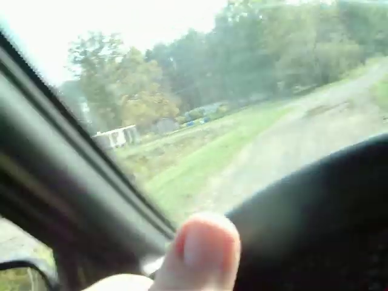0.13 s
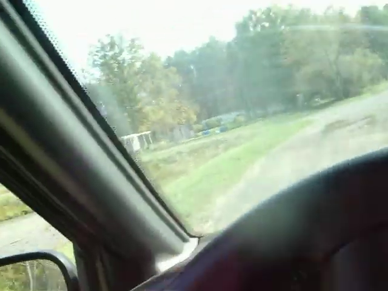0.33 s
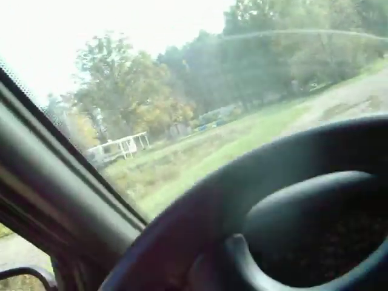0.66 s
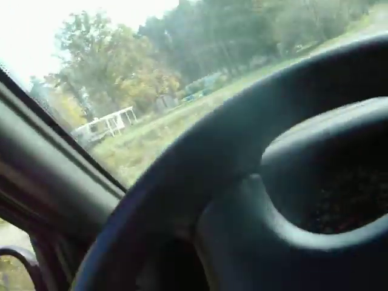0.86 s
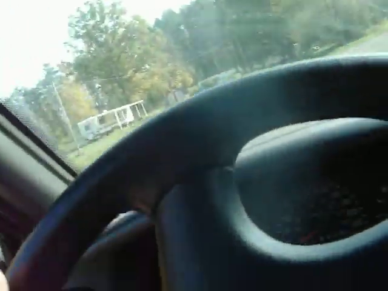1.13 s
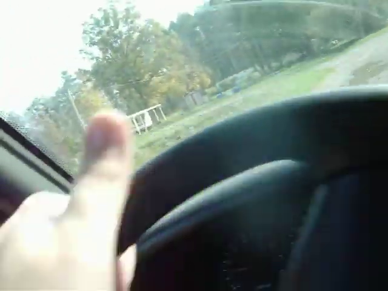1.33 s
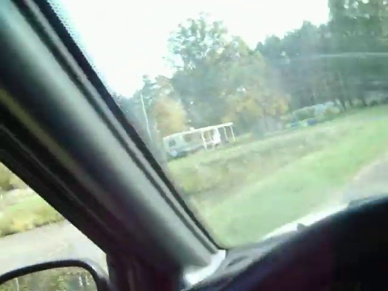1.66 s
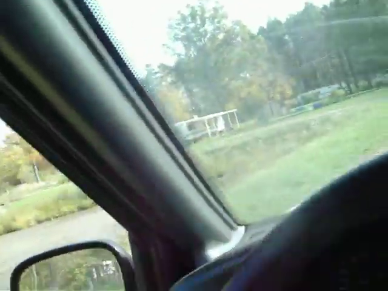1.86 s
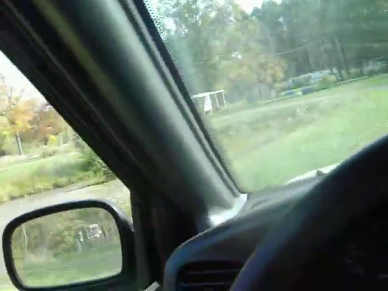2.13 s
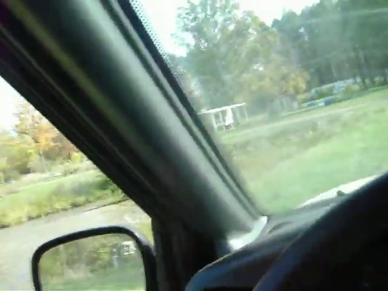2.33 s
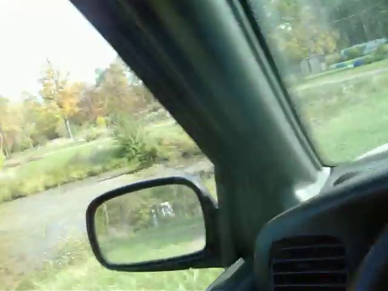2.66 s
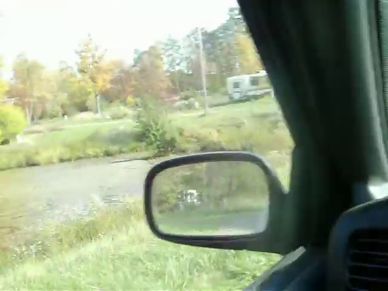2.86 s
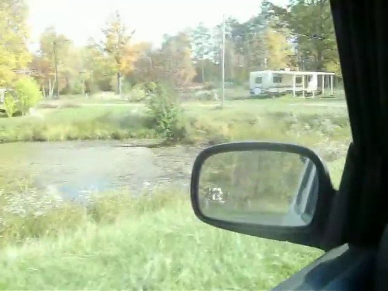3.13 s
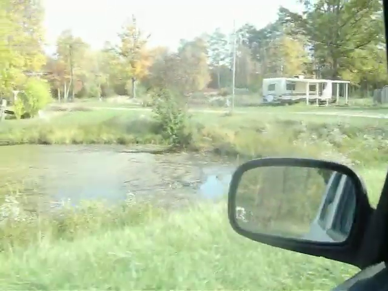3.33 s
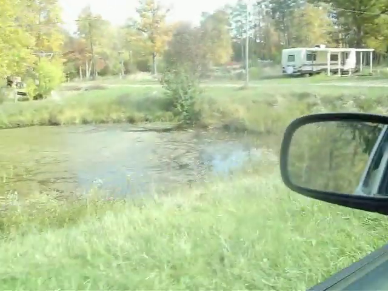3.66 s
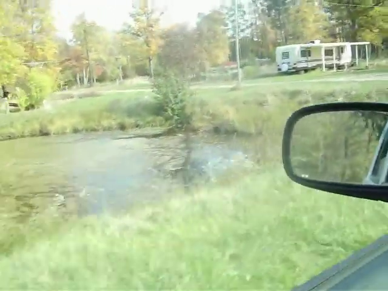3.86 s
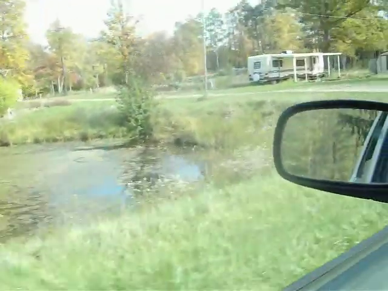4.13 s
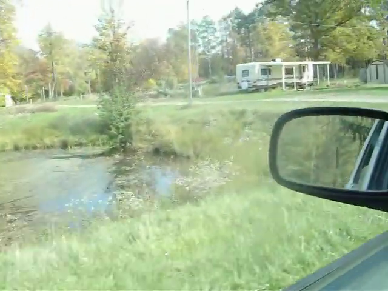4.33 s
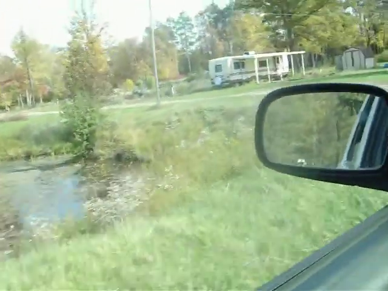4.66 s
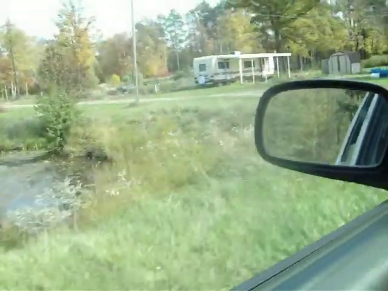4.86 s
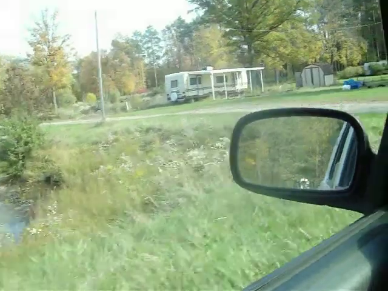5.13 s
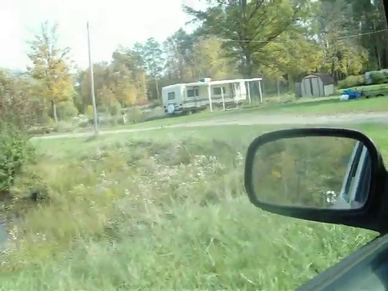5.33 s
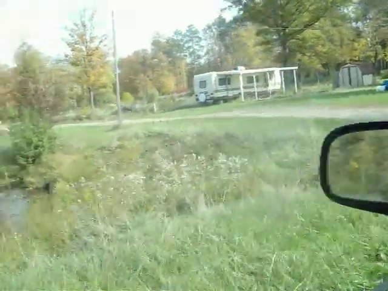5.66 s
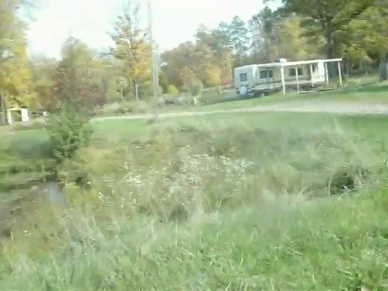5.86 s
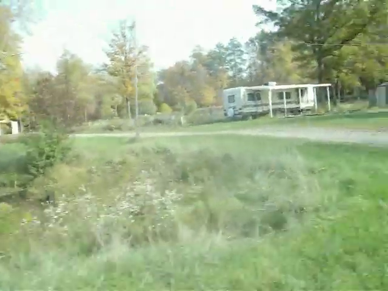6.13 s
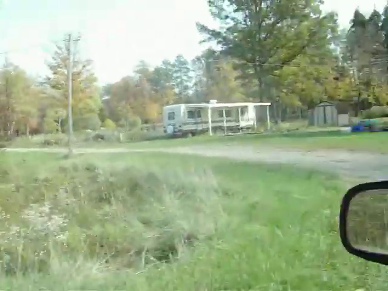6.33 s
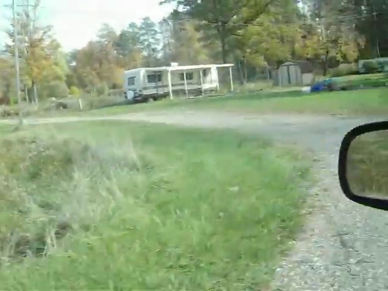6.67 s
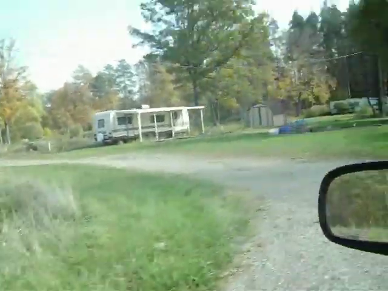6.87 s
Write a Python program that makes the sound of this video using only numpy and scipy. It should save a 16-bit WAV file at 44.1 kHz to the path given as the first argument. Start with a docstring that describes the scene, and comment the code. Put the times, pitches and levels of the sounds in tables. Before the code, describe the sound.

Inside a slow car with the window open, gravel crunches and hisses while stones knock underneath, the suspension thumps and trim rattles.

```python
"""A low, wavering cab boom and body rumble come first, under crunching gravel and hissing tyres.
A car rolls slowly over grass and gravel, heard by a small camera held at the open driver's window.
Boom is a tone with a noise skirt; rumble, crunch and hiss are banded noise driven by random grains.
Snaps are noise bursts; knocks, thuds and ticks ring clusters of modes; one metal clink is two sines.
The hiss peaks near 4 kHz, the converter stops near 6 kHz and the loudest peaks clip."""
import sys
import numpy as np
from scipy import signal
from scipy.fft import rfft, irfft, next_fast_len
from scipy.io import wavfile
from scipy.ndimage import uniform_filter1d

SR = 44100
rng = np.random.default_rng(int(sys.argv[2]) if len(sys.argv) > 2 else 0)


def store_pcm(level_fs):
    """Save levels as 16-bit WAV."""
    pcm = np.round(np.clip(level_fs, -1, 1) * 32767).astype(np.int16)
    wavfile.write(sys.argv[1], SR, np.atleast_2d(pcm).T)


N = 309141

# Slow levels of the rolling layers, before dips and wavering:
# start_s, boom_db, body_db, crunch_db, hiss_db [s, dB, dB, dB, dB]
ROLLING_LEVELS = [(0, -16, -18.5, -25, -27.5), (.4, -21.5, -21, -23, -31.5), (.7, -15.5, -16.5, -22, -27),
                  (1.0, -18, -19.5, -24, -29.5), (1.2, -23, -23.5, -23.5, -29),
                  (1.36, -12, -17.5, -21.5, -26.5), (1.65, -17, -21, -22, -26),
                  (1.82, -17.5, -20, -20, -26), (2.05, -16, -18, -20.5, -28), (2.3, -16, -20.5, -22, -27.5),
                  (2.6, -17.5, -21.5, -24, -28), (2.9, -19.5, -22.5, -23.5, -28),
                  (3.3, -13, -21, -21, -26.5), (3.65, -21.5, -23.5, -21, -27.5),
                  (3.9, -26, -20.5, -20.5, -26), (4.2, -26, -20, -17.5, -24.5),
                  (4.42, -18.5, -24.5, -20.5, -23.5), (4.75, -24, -16.5, -20.5, -24.5),
                  (5.1, -20, -19, -18, -22.5), (5.5, -17.5, -21, -21.5, -24.5), (5.75, -14, -12, -19, -25),
                  (6.1, -28, -23, -21.5, -30.5), (6.3, -17, -19.5, -23.5, -30.5),
                  (6.5, -18, -23, -21, -30.5), (6.75, -30, -17.5, -20.5, -28.5),
                  (7.01, -26.5, -17, -20, -28)]
# Sudden drops of the rolling sound: start_s, depth_db, hold_s, return_s [s, dB, s, s]
ROLLING_DIPS = [(1.403, 5.5, 0.32, 0.14), (3.913, 7.5, 0.2, 0.26), (4.09, 1, 0.037, 0.081),
                (4.466, 5.5, 0.07, 0.069), (5.802, 5.5, .02, 0.013)]
# Road jolts that swell the cab boom, before its mix: crest_s, level_db, pitch_hz [s, dB, Hz]
BOOM_JOLTS = [(.13, -16, 47.1), (.27, -9.5, 47.2), (.6, -9.5, 48.1), (.72, -14, 52.3), (.8, -12, 51.2),
              (.88, -11.5, 51.2), (1.03, -18, 47.65), (1.17, -8, 53.3), (1.31, -10, 54.2),
              (1.39, -6.5, 55.4), (1.8, -13, 54.87), (1.96, -11, 53.8), (2.05, -6.5, 54.1),
              (2.22, -20.5, 52.05), (2.5, -12, 48.3), (2.64, -8, 46.04), (2.83, -13, 58.25),
              (3.03, -18, 44), (3.3, -17, 43.3), (3.47, -21, 48), (3.65, -15.5, 53), (4.1, -18.5, 50.5),
              (4.37, -10.5, 50.44), (4.63, -7, 51.88), (4.72, -15, 48.47), (4.92, -14, 40.9),
              (5.08, -12.5, 52.8), (5.23, -13, 52.2), (5.41, -18, 42.7), (5.56, -14.5, 45.6),
              (5.7, -0.5, 47.77), (5.779, -10, 54.8), (5.86, -10, 54.4), (6.19, -15, 48.5),
              (6.36, -8.5, 49.7), (6.6, -13, 50.1), (6.95, -14.5, 50.3)]
# Noise colour of the body rumble: frequency_hz, density_db [Hz, dB per Hz]
BODY_COLOUR = [(60, 0), (100, -2.5), (140, 0.5), (178, -3), (205, 1.5), (235, -3), (285, -3.5), (320, -2),
               (355, -6), (392, -4), (450, -15.5), (600, -23.5), (800, -24)]
# Noise colour of the gravel crunch: frequency_hz, density_db [Hz, dB per Hz]
CRUNCH_COLOUR = [(300, -2), (450, 1), (650, 0), (900, -2), (1200, -6.5), (1800, -9), (2500, -14),
                 (3500, -23)]
# Brightness of the gravel crunch, before its wavering: start_s, tilt_db [s, dB per octave]
CRUNCH_TILT = [(0, 1.5), (.5, 0.5), (1, 0.5), (1.4, -0.5), (1.7, -1.5), (2.2, 2.5), (2.55, 2.5), (3, 0),
               (3.5, 2), (3.9, 0.5), (4.2, -0.5), (4.6, -1), (5.1, 0), (5.5, 2), (5.8, -2), (6.2, -1),
               (6.6, 0), (7.01, 1)]
# Noise colour of the tyre hiss: frequency_hz, density_db [Hz, dB per Hz]
HISS_COLOUR = [(1600, -22), (2600, -16.5), (3300, -12.5), (4000, -5), (4500, -13), (5200, -21), (5800, -21),
               (6400, -43.5)]
# Dry broad snaps, before the treble loss: start_s, level_db [s, dB]
DRY_SNAPS = [(0.0115, -9.5), (0.076, -10), (0.243, -6.5), (0.5901, -4.5), (0.7287, -7), (0.8864, -10),
             (1.2162, -6), (2.7651, -5), (3.3423, -5), (3.9063, -7.5), (3.9537, -16), (4.0851, -7.5),
             (4.463, -5), (4.5582, -10), (4.6217, -7), (5.211, -4), (5.7912, -12), (6.032, -7.5),
             (6.2272, -5), (6.3637, -5)]
# Stones knocking under the floor, before the treble loss: start_s, level_db, pitch_hz, t60_s [s, dB, Hz, s]
STONE_KNOCKS = [(0.045, -7.5, 705, 0.084), (0.215, -7, 686, 0.065), (0.242, -3, 664, 0.051),
                (0.562, -8, 773, 0.061), (1.054, -9.5, 1095, 0.065), (1.358, 4.5, 663, 0.079),
                (2.132, -9, 904, 0.054), (2.206, -7, 880, 0.076), (2.35, -9, 1570, 0.056),
                (2.383, -5, 1043, 0.055), (2.449, -8, 840, 0.065), (2.692, -9.5, 1756, 0.057),
                (2.765, -4, 1148, 0.087), (2.789, -5.5, 802, 0.069), (2.819, -8, 732, 0.12),
                (2.874, -5.5, 1108, 0.077), (3.048, -8, 633, 0.12), (3.079, -5.5, 1066, 0.072),
                (3.313, -9, 799, 0.081), (3.341, -2.5, 882, 0.07), (3.484, -9, 961, 0.084),
                (3.545, -8.5, 619, 0.071), (3.701, -5, 652, 0.065), (3.756, -7.5, 787, 0.079),
                (4.278, -9, 877, 0.096), (4.328, -11, 901, 0.065), (4.359, -6.5, 862, 0.084),
                (4.462, -5, 649, 0.039), (4.603, 1, 790, 0.084), (4.797, -6.5, 970, 0.062),
                (4.841, -8, 708, 0.065), (4.908, -12, 627, 0.065), (4.96, -11, 665, 0.059),
                (5.21, -9, 622, 0.076), (5.361, -8.5, 1307, 0.081), (5.437, -10.5, 1464, 0.061),
                (5.487, -4, 632, 0.065), (5.664, -1.5, 710.6, 0.064), (5.736, 2.5, 652, 0.065),
                (5.828, -6, 752, 0.079), (5.926, -13, 604, 0.061), (5.973, -10.5, 896, 0.052),
                (6.031, -6.5, 1124, 0.059), (6.139, -16, 673, 0.057), (6.178, -7.5, 758, 0.078),
                (6.222, -2, 689, 0.077), (6.244, 1, 673, 0.079), (6.379, -6, 1070, 0.064),
                (6.43, -9, 813, 0.062), (6.656, -12, 890, 0.065), (6.673, -8, 884, 0.071),
                (6.72, -3.5, 965, 0.057), (6.755, -5, 605, 0.043), (6.851, -5.5, 1047, 0.074)]
# Bumps through the suspension, before the treble loss; the swell shifts the body rumble:
# start_s, level_db, pitch_hz, swell_db [s, dB, Hz, dB]
SUSPENSION_THUDS = [(0.075, -9, 355, 0), (0.209, -8, 325, -3), (0.396, -11, 328, 1),
                    (0.477, -13.5, 132, -0.5), (0.569, -9.5, 220, -4), (0.66, -5, 286, 3),
                    (0.946, -11, 204, 7.5), (1.355, -3.5, 400, 5), (1.859, -10, 385, -1),
                    (1.929, -8.5, 312, 4.5), (2.498, -16, 202, 4), (3.459, -10, 200, 0.5),
                    (3.548, -11, 320, 3), (3.707, -6.5, 291, 0), (3.814, -10.5, 287, -1),
                    (4.355, -11, 285, 4), (4.425, -12, 139, 5), (4.596, -18, 153.4, 9),
                    (4.891, -11, 209, -1), (4.993, -16, 328, -1), (5.067, -9, 291.5, 0),
                    (5.129, -11, 160, 2), (5.343, -9, 306, 7.5), (5.483, -15, 410.5, 1),
                    (5.62, -5.5, 322.8, 4), (5.662, -5.5, 411.3, 0), (5.709, -12, 147.8, 2.5),
                    (5.827, -8, 431, 2), (6.076, -6.5, 324, 0), (6.36, -5, 192, 6), (6.564, -5, 314, 12.5),
                    (6.742, -5.5, 176.6, 1), (6.821, -2, 319, 0.5), (6.937, -5, 190, 4)]
# Small trim and grit ticks, before the treble loss: start_s, level_db, pitch_hz [s, dB, Hz]
TRIM_TICKS = [(0.128, -8.5, 3870), (0.209, -9.5, 4070), (0.2984, -19, 4020), (0.3162, -13.5, 3900),
              (0.3634, -6, 3880), (0.5496, -11.5, 4170), (0.6725, -9.5, 4015), (0.6993, -16.5, 3570),
              (0.7544, -11, 3960), (0.8006, -9, 3410), (0.9195, -7.5, 3900), (0.9467, -11, 4260),
              (1.1518, -12, 3760), (1.1698, -11.5, 4020), (1.3618, -6.5, 3980), (1.4526, -13.5, 3950),
              (1.509, -17, 3540), (1.54, -16, 3920), (1.6517, -10.5, 3900), (1.7025, -20, 4090),
              (1.8537, -13, 3940), (1.8896, -10, 3800), (2.0099, -12, 3670), (2.0286, -9.5, 4000),
              (2.123, -12, 3800), (2.2413, -12.5, 3900), (2.4556, -9, 4070), (2.4911, -15, 3990),
              (3.3587, -19, 3614), (3.6344, -7, 4120), (3.791, -6.5, 3300), (4.351, -12, 3660),
              (4.4179, -11, 4240), (4.585, -10.5, 4230), (4.9132, -19, 4099), (5.6236, -21, 3800),
              (5.7551, -7, 3710), (6.0975, -14, 3728), (6.1808, -12, 3950), (6.2272, -15, 3910),
              (6.355, -9, 3856), (6.8103, -10, 3900), (6.846, -17, 2510)]
# Modes of a loose metal part: pitch_hz, level_db, t60_s [Hz, dB, s]
CLINK_MODES = [(3790, -21, .3), (4250, -26, .55)]

JOLT_RISE_S, JOLT_FALL_S = 0.028, 0.028  # widths of the bell-shaped swell
BOOM_WAVER = 0.055  # random pitch spread, as a share of the pitch
GRAIN_TOP_DB = 9  # ceiling on tyre grain size, before levelling
RING_S = 0.25  # length of every blow and snap
SNAP_T60_S, SNAP_HZ = 0.013, (990, 4280)
CRACK_T60_S, CRACK_HZ = 0.012, (1210, 4830)  # dry edge at the start of a blow
KNOCK_SPREAD_OCT = 0.629
THUD_T60_S, THUD_SPREAD_OCT, SWELL_T60_S = 0.097, 0.43, 0.12
TICK_T60_S, TICK_SPREAD_OCT = 0.054, 0.5
CLINK_S = 5.898  # moment of the tap
BLOW_TOP_HZ = 4430  # seats and trim swallow the treble of blows and snaps
SOFT_TOP = 1.23  # the capsule starts to round peaks near this size
CONVERTER_HZ, CLIP, TOP_HZ = 5990, 0.715, 15800


def undb(db):
    """Decibels to amplitude."""
    return 10 ** (np.asarray(db) / 20)


def unit(x):
    """Scale to an RMS of 1."""
    return x / np.sqrt(np.mean(x ** 2))


def add(out, start_s, sound):
    """Mix a sound in at its start time, cut at the end of the scene."""
    i = int(start_s * SR)
    out[i:i + len(sound)] += sound[:N - i]


def curves(table):
    """Straight lines through each column of a table, over the first column's times."""
    times, *columns = np.transpose(table)
    return [np.interp(np.arange(N) / SR, times, column) for column in columns]


def walk(rate):
    """Random levels drawn rate times a second and smoothed twice; RMS 1."""
    step = int(SR / rate)
    held = np.repeat(rng.standard_normal(N // step + 1), step)
    slewed = uniform_filter1d(uniform_filter1d(held, step), step)
    return unit(slewed[:N])


def fade(t60, rise_s, length_s=RING_S):
    """Time axis and envelope of a blow: quick rise, exponential fall."""
    t = np.arange(int(length_s * SR)) / SR
    return t, 1000 ** (-t / t60) * (1 - np.exp(-t / rise_s))


def resonance(x, hz, width):
    """One resonant peak, width in Hz."""
    return signal.lfilter(*signal.iirpeak(hz, hz / width, SR), x)


def double_resonance(x, hz, width):
    """The same peak twice for steeper skirts, levelled to RMS 1."""
    return unit(resonance(resonance(x, hz, width), hz, width))


def grit(rate, scatter_db, top_db, grain_s):
    """Envelope of random grains with sudden starts and short tails; few are large, sizes capped."""
    when, size = rng.random(N), rng.exponential(size=N)
    starts = (when < rate / SR) * undb(np.minimum(scatter_db * size, top_db))
    return unit(signal.lfilter([1], [1, -np.exp(-1 / (grain_s * SR))], starts))


def texture(colour, grains, smooth_db, flicker_db, flicker_rate, tilt_db=0, pivot_hz=1000):
    """Third-octave bands of noise, steady part plus shared grains, each band flickering alone."""
    hz, db = np.transpose(colour)
    size = next_fast_len(N)
    octaves = np.log2(np.fft.rfftfreq(size, 1 / SR) + 1)
    noise = rng.standard_normal(N) * (undb(smooth_db) + grains)
    spectrum = rfft(noise, size) * undb(np.interp(octaves, np.log2(hz), db, -99, -99))
    out = 0
    for centre in np.arange(np.log2(hz[0]), np.log2(hz[-1]), 1 / 3):
        overlap = np.clip(1 - 3 * abs(octaves - centre), 0, 1)  # triangular band
        band = irfft(spectrum * overlap, size)[:N]
        tilt = tilt_db * (centre - np.log2(pivot_hz))
        out = out + band * undb(flicker_db * walk(flicker_rate) + tilt)
    return unit(out)


def dips_db():
    """Each dip falls at once, holds, then climbs back in a straight line in dB."""
    t = np.arange(N) / SR
    out = np.zeros(N)
    for start_s, depth_db, hold_s, return_s in ROLLING_DIPS:
        remaining = np.clip(1 - (t - start_s - hold_s) / return_s, 0, 1)
        out -= (t > start_s) * depth_db * remaining
    return out


def boom(steady_db):
    """Engine shake and road jolts pump the air in the cab: a wavering low tone with a rough skirt."""
    t = np.arange(N) / SR
    size = undb(steady_db + 1.8 * walk(15))
    for crest_s, db, _ in BOOM_JOLTS:
        width_s = np.where(t < crest_s, JOLT_RISE_S, JOLT_FALL_S)
        swell = undb(db) * np.exp(-((t - crest_s) / width_s) ** 2)
        size = np.maximum(size, swell)
    _, hz = curves(BOOM_JOLTS)
    wavering_hz = hz * (1 + BOOM_WAVER * walk(23))
    tone = np.sqrt(2) * np.sin(2 * np.pi * np.cumsum(wavering_hz) / SR)
    skirt = double_resonance(rng.standard_normal(N), 38, 50)
    return size * (0.53 * tone + 0.35 * skirt)


def swells_db():
    """The body rumble shifts in level for a moment after a bump, mostly louder."""
    out = np.zeros(N)
    shape = fade(SWELL_T60_S, 0.0064)[1]
    for start_s, _, _, db in SUSPENSION_THUDS:
        add(out, start_s, db * shape / shape.max())
    return out


def body_rumble(body_db):
    """Body panels rumble as mostly steady low noise, shifted in level by the bumps."""
    grains = grit(35, 7.4, 7.7, 0.011)
    noise = texture(BODY_COLOUR, grains, smooth_db=16.5, flicker_db=0.83, flicker_rate=3.02)
    return undb(body_db + swells_db() + 0.54 * walk(14)) * noise


def gravel_crunch(stones, fines):
    """Stones and crushed grit under the tyres excite middle noise of drifting brightness."""
    tilt = curves(CRUNCH_TILT)[0] + 0.36 * walk(8)
    return texture(CRUNCH_COLOUR, stones + 0.47 * fines, smooth_db=3,
                   flicker_db=1.06, flicker_rate=12, tilt_db=tilt)


def tyre_hiss(stones, fines):
    """High noise follows the crunch's stones and grit, plus finer chips of its own."""
    chips = grit(100, 1.4, GRAIN_TOP_DB, 0.0077)
    return texture(HISS_COLOUR, 0.12 * stones + chips + 0.35 * fines, smooth_db=2,
                   flicker_db=0.3, flicker_rate=23, tilt_db=0.55 * walk(15), pivot_hz=3800)


def tyres(crunch_db, hiss_db):
    """Crunch and hiss share their grains and the unevenness of the ground."""
    stones = grit(70, 1.3, GRAIN_TOP_DB, 0.012)
    fines = grit(500, 6.4, GRAIN_TOP_DB, 0.0017)  # dense crackle of crushed grit
    patchy = walk(15)
    crunch = undb(crunch_db + 0.8 * patchy) * gravel_crunch(stones, fines)
    return crunch + undb(hiss_db + 0.7 * patchy) * tyre_hiss(stones, fines)


def noise_burst(noise, band_hz, t60, rise_s):
    """Band-passed noise with a quick rise and fall, peak 1."""
    burst = signal.lfilter(*signal.butter(1, band_hz, "band", fs=SR), noise) * fade(t60, rise_s)[1]
    return burst / abs(burst).max()


def snaps():
    """Very short dry bursts of noise, broad across the middle and treble."""
    out = np.zeros(N)
    for start_s, db in DRY_SNAPS:
        noise = rng.standard_normal(int(RING_S * SR))
        add(out, start_s, undb(db) * noise_burst(noise, SNAP_HZ, SNAP_T60_S, 0.00027))
    return out


def hits(table, spread, clean, rise_s, crack_db, t60=None, count=6):
    """Each blow cracks and rings panel modes around its pitch, inside a burst of noise.

    spread is in octaves, clean is the share of modes against noise, crack_db is relative to the ring.
    """
    out = np.zeros(N)
    for start_s, db, hz, *more in table:
        noise = rng.standard_normal(int(RING_S * SR))
        t, shape = fade(t60 or more[0], rise_s)
        place = np.linspace(-1, 1, count) + 0.1363 * rng.standard_normal(count)
        mode_hz = hz * 2 ** (spread * place)
        modes = np.exp(-1.2 * place ** 2) @ np.sin(2 * np.pi * np.outer(mode_hz, t))
        burst = double_resonance(noise, hz, hz * 1.35 * spread)
        ring = shape * (clean * unit(modes) + (1 - clean) * burst)
        crack = noise_burst(noise, CRACK_HZ, CRACK_T60_S, 0.00016)
        add(out, start_s, undb(db) * (ring / abs(ring).max() + undb(crack_db) * crack))
    return out


def knocks():
    """Stones pop and knock under the floor, each with its own ring time."""
    return hits(STONE_KNOCKS, KNOCK_SPREAD_OCT, 0.63, 0.00017, crack_db=-18.5)


def thuds():
    """Bumps through the suspension ring low panel modes with a softer start."""
    return hits(SUSPENSION_THUDS, THUD_SPREAD_OCT, 0.45, 0.0028, crack_db=-17.5, t60=THUD_T60_S)


def ticks():
    """Trim and grit tick with high, brief modes and a strong crack."""
    return hits(TRIM_TICKS, TICK_SPREAD_OCT, 0.6, 0.0005, crack_db=-6, t60=TICK_T60_S)


def clink():
    """One tap on a loose metal part rings two fading sines."""
    out = np.zeros(N)
    for hz, db, t60 in CLINK_MODES:
        t, shape = fade(t60, 0.0011, length_s=0.98)
        add(out, CLINK_S, undb(db) * shape * np.sin(2 * np.pi * hz * t))
    return out


def scene():
    """Rolling layers under the dips, then muffled blows and the clink on top."""
    boom_db, body_db, crunch_db, hiss_db = curves(ROLLING_LEVELS)
    dips = dips_db()
    low_air = boom(boom_db + 0.6 * dips)  # the steady boom dips less
    rolling = low_air + undb(dips) * (body_rumble(body_db) + tyres(crunch_db, hiss_db))
    blows = snaps() + knocks() + thuds() + ticks()
    muffled = signal.sosfilt(signal.butter(4, BLOW_TOP_HZ, fs=SR, output="sos"), blows)
    return (rolling + muffled + clink())[None]


def record(dry):
    """The capsule rounds peaks, the converter's band fades and ends; clipping splashes faintly above."""
    rounded = SOFT_TOP * np.tanh(dry / SOFT_TOP)
    faded = signal.sosfilt(signal.butter(6, 5300, fs=SR, output="sos"), rounded)
    narrow = signal.sosfilt(signal.ellip(10, 0.2, 90, CONVERTER_HZ, fs=SR, output="sos"), faded)
    clipped = np.clip(narrow, -CLIP, CLIP)
    return signal.sosfilt(signal.ellip(8, 0.1, 70, TOP_HZ, fs=SR, output="sos"), clipped)


dry = scene()
out = record(dry)
store_pcm(out)
```